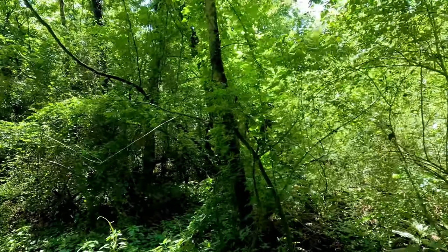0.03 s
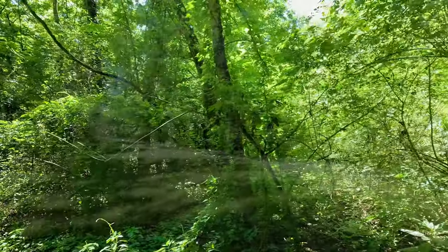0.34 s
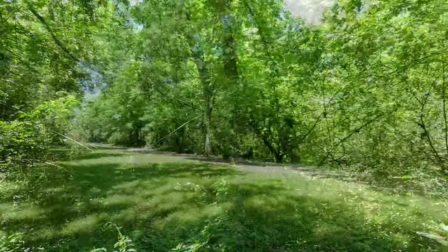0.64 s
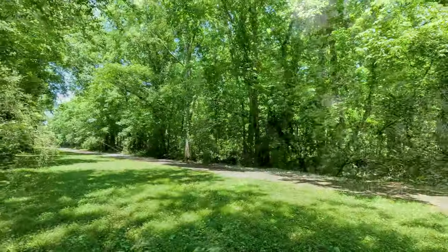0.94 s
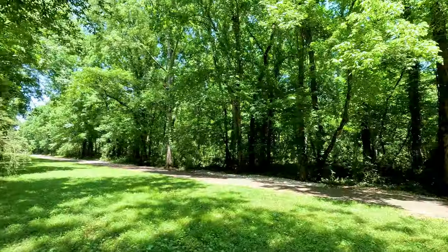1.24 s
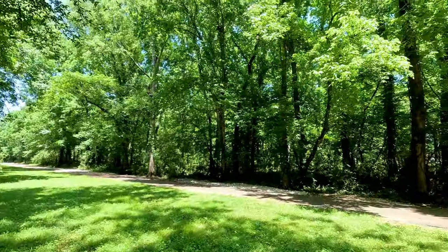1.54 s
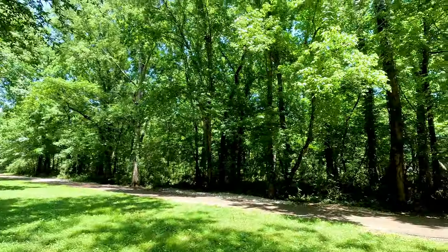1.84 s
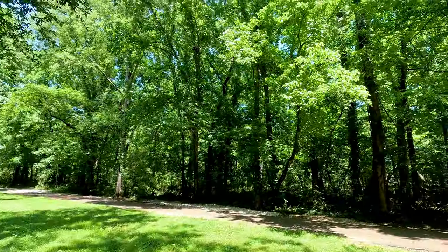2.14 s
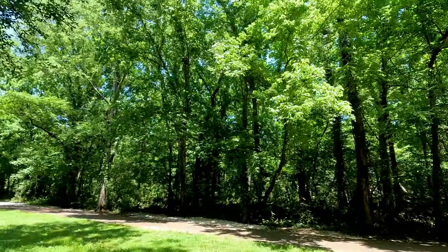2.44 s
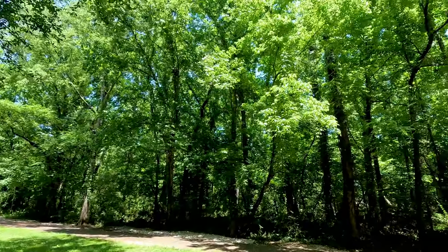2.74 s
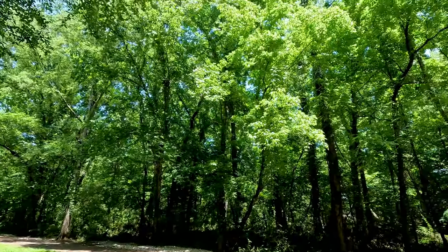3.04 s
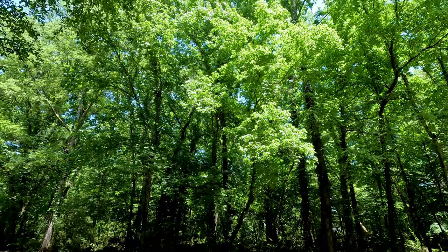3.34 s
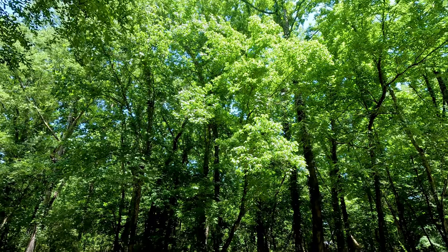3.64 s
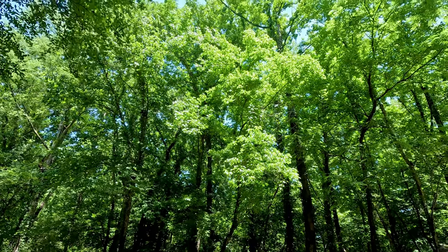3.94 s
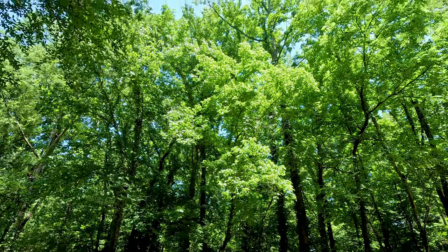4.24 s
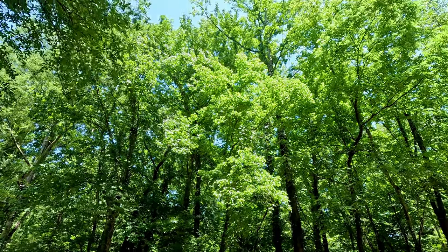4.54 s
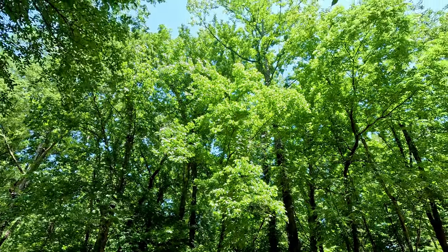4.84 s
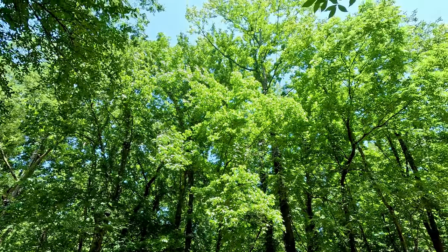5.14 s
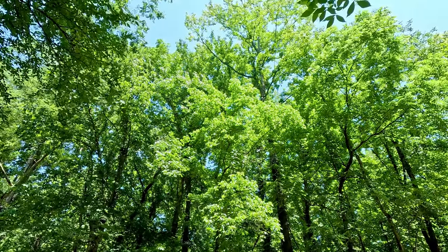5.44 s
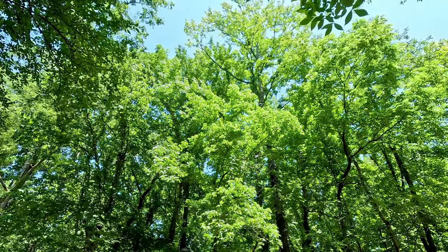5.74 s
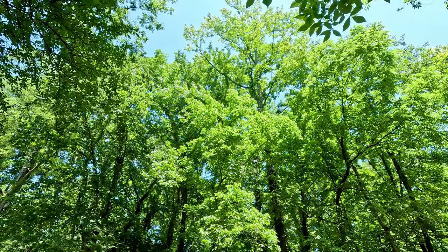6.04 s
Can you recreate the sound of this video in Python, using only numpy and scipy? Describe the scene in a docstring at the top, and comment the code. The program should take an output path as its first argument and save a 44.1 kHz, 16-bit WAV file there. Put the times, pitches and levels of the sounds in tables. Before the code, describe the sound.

A dense cicada chorus buzzes high and steady over a hollow whine, with a low rumble of distant traffic.

```python
"""Periodical cicadas in a sunny wood

One species buzzes near 6 kHz, its clicking tymbals driving a resonant abdomen, and surges now and then;
another holds a hollow whine near 1.1 kHz. A songbird whistles faintly and a distant road rumbles below.
Early on, the sound cross-fades from a thicket, where tyres and engines are louder, to an open lawn.
A few puffs of breeze buffet the microphone."""
import sys
import numpy as np
from scipy import signal
from scipy.fft import rfft, irfft, next_fast_len
from scipy.io import wavfile
from scipy.ndimage import uniform_filter1d

SR = 44100
rng = np.random.default_rng(int(sys.argv[2]) if len(sys.argv) > 2 else 0)


def digitize_waveform(pressure):
    """Quantize a signal to 16-bit integers and store it at the path in sys.argv[1].

    Rows of a 2-D input are taken as channels; values are limited to [-1, 1].
    """
    field = np.atleast_2d(pressure).T
    bounded = np.clip(field, -1, 1)
    quanta = np.round(bounded * 32767).astype(np.int16)
    wavfile.write(sys.argv[1], SR, quanta)


N = 268569
FADE_START_S, FADE_S = 0.41, 0.71  # the cross-fade from the thicket to the lawn


def buzz(tree_count=14, rise_db_per_s=0.32, deep_db=-1.5, whistle_db=-18):
    """Source and filter: tymbal clicks excite the resonances of hollow abdomens; a whistle rides on top."""
    # resonance curve of the abdomen: f/Hz, relative level/dB
    abdomen = [(2000, -55), (3000, -27), (3850, -11.5), (4700, -9.5), (5350, -1.5), (5900, -0.5),
               (6450, -3), (7200, -11.5), (7850, -17.5), (9000, -26.5), (10200, -46.5), (11800, -35),
               (13500, -54), (15000, -61)]
    # the fuller timbre in the thicket: f/Hz, gain/dB
    thicket_colour = [(2700, 1), (3500, 1), (4400, 1.6), (5500, -1.1), (9000, 0)]
    trees = steady(sum(ongoing(tymbals(click_hz=381.6, swell_db=3.5, count=3)) for _ in range(tree_count)))
    deep_wood = rng.standard_normal((2, N))  # clicks too many to tell apart
    chorus = diffuse(coloured(trees + amp(deep_db) * deep_wood, abdomen), left_db=1.3)
    chorus = lawn_share() * chorus + (1 - lawn_share()) * coloured(chorus, thicket_colour)
    whistle = diffuse(ongoing(held_note(hz=5870, waver=0.00137, swell_db=-1)), left_db=-4)
    flutter = amp(0.14 * wobble(25.2) + 0.3 * wobble(7.6))
    rise_db = rise_db_per_s * (times() - FADE_START_S - FADE_S) + surges()
    level = crossfade(thicket_db=-30.5, lawn_db=-31 + rise_db)
    return level * (flutter * chorus + amp(whistle_db) * whistle)


def tymbals(click_hz, swell_db, count):
    """Buckling: the ribs of each insect in a tree snap in an uneven impulse train that swells and fades."""
    clicks = np.zeros(N)
    for _ in range(count):
        rate_hz = click_hz * np.exp(.25 * rng.standard_normal() + .15 * wobble(90))
        cycles = np.cumsum(rate_hz) / SR
        snaps = np.flatnonzero(np.diff(np.floor(cycles)))
        strength = amp(swell_db * wobble(2.54)[snaps] + rng.normal(0, 2.7, len(snaps)))
        clicks[snaps] += strength * rng.choice([-1, 1], len(snaps))
    return unit(clicks)


def surges(attack_s=0.089, release_s=0.24):
    """Attack, hold and exponential release of the decibels that joining groups add to the buzz."""
    # groups of cicadas join in and drop out: onset t/s, hold/s, rise/dB
    groups = [(0.62, 0.39, 1), (1.156, 0.21, 0.9), (1.55, .2, 0.4), (2.04, .1, 1.2), (2.18, 0.12, 1),
              (2.92, 1, 0.93), (3.968, 0.11, 1.3), (4.07, 0.28, 0.9), (4.49, 0.5, 2.5), (5.28, .25, 0.6)]
    t = times()
    return sum(db * np.clip((t - onset) / attack_s, 0, 1)
               * np.exp(-np.maximum(t - onset - hold, 0) / release_s) for onset, hold, db in groups)


def whine(throb_db=0.6, low_choir_db=-7):
    """Superposition: a high choir swells over a weaker low one; the farthest insects blur into noise."""
    # waves of overlapping calls in the high choir: peak t/s, half length/s, rise/dB
    waves = [(1.22, 0.088, 4.5), (1.55, .06, 2.5), (2.074, 0.035, 7), (2.29, 0.063, 6), (2.79, 0.069, 5.5),
             (3.013, 0.075, 3), (3.244, .06, 5.5), (3.56, 0.031, 6.5), (3.76, 0.039, 5.5),
             (4.117, 0.031, 8), (4.33, .06, 2), (4.57, 0.041, 4), (5.08, 0.064, 5), (5.41, 0.064, 5),
             (5.66, 0.074, 5), (6.045, .05, 6.5)]
    # spectrum of the farthest insects: f/Hz, relative level/dB
    far_spectrum = [(400, -60), (650, -16.5), (800, -4.5), (915, -4.5), (1020, -1.5), (1150, -1),
                    (1260, -6.5), (1420, -9.5), (1700, -13.5), (2250, -21), (3000, -23.5), (5000, -81)]
    waves_db = sum(db * swell(peak_s, half_s) for peak_s, half_s, db in waves)
    throb = amp(waves_db + throb_db * wobble(8))
    high = throb * choir(hz=1112.0, spread=.046, waver=.013, count=14)
    low = amp(low_choir_db) * choir(hz=927.6, spread=.045, waver=.024, count=6)
    far = diffuse(noise(far_spectrum), left_db=0.5)
    return (crossfade(thicket_db=-43.5, lawn_db=-44.5) * high
            + crossfade(thicket_db=-42, lawn_db=-40.5) * (far + low))


def choir(hz, spread, waver, count):
    """Chorus effect: held notes clustered round one pitch merge among the trees into a drone of rms 1."""
    pitches = hz * (1 + spread * np.arcsin(np.linspace(-1, 1, count)) / (np.pi / 2))
    voices = sum(ongoing(held_note(pitch, waver, swell_db=1.5)) for pitch in pitches)
    return steady(diffuse(voices, left_db=1.5))


def held_note(hz, waver, swell_db):
    """Random frequency and amplitude modulation make an unsteady tone of rms 1."""
    pitch = hz * (1 + waver * (wobble(3) + wobble(60)))
    return unit(amp(swell_db * wobble(2.53)) * np.sin(2 * np.pi * np.cumsum(pitch) / SR))


def bird(trill_hz=75, waver_hz=12, accent_db=-3.0, direct_db=-5.0, reverberant_db=-4.0):
    """Frequency modulation: whistles slide to a pitch, some with a fast trill, and echo in the trees."""
    # whistled notes: t/s, length/s, slide/s, start f/Hz, held f/Hz, end f/Hz,
    # relative level/dB, trill depth/Hz
    notes = [(1.45, 0.053, 0.027, 2900, 2340, 2320, -51.5, 0),
             (1.662, 0.045, 0.026, 2860, 2470, 2390, -51.5, 0),
             (2.02, .086, 0.04, 3200, 3110, 3070, -47, 190), (2.178, 0.11, .05, 3080, 2700, 2670, -50, 0),
             (2.32, 0.084, 0.035, 2720, 2670, 2560, -51, 90),
             (2.41, 0.18, 0.082, 2720, 2830, 2850, -54, 220),
             (2.448, .062, 0.028, 3210, 3280, 3170, -46, 80),
             (2.541, 0.088, 0.043, 3100, 3210, 3260, -47, 100),
             (2.73, .055, .028, 2580, 2480, 2330, -52.5, 198),
             (2.95, .045, .022, 2690, 2730, 2760, -54, 30), (3.525, 0.099, .045, 2880, 2515, 2490, -52, 0),
             (3.633, .085, .03, 2540, 2580, 2580, -59, 30), (4.305, .04, .02, 2890, 2920, 3050, -53, 110),
             (4.338, 0.065, .05, 2880, 2430, 2440, -51, 40), (4.808, 0.067, .04, 3080, 2700, 2700, -58, 30),
             (4.89, .125, 0.075, 2680, 2810, 2920, -58, 30),
             (5.93, 0.1, .047, 2480, 2560, 2650, -55.5, 130), (6.045, 0.044, .02, 3340, 3260, 3150, -46, 2)]
    song = np.zeros(N + SR)
    for onset, length, slide, start, held, end, db, depth in notes:
        progress = np.linspace(0, 1, int(length * SR))
        glide = np.interp(progress, [0, min(slide / length, 1), 1], [start, held, end])
        trill = depth * np.sin(2 * np.pi * trill_hz * length * progress)
        pitch = glide + waver_hz * wobble(207)[:len(progress)] + trill
        envelope = amp(accent_db * progress) * np.sqrt(np.abs(np.sin(np.pi * progress)))
        note = unit(envelope * np.sin(2 * np.pi * np.cumsum(pitch) / SR))
        song[round(onset * SR):][:len(note)] += amp(db) * note
    return amp(direct_db) * song[:N] + amp(reverberant_db) * forest(song)[:, :N]


def rumble(fall_db_per_s=0.38):
    """Amplitude-modulated noise: the bass of far traffic swells, dips and slowly sinks."""
    # spectrum of the rumble: f/Hz, relative level/dB
    spectrum = [(8, -37), (20, 0.5), (35, -1.5), (65, 2), (95, -3.5), (130, -2.5), (175, -12), (280, -55),
                (600, -83)]
    # swells and dips: t/s, half length/s, change/dB
    swells = [(0.15, 0.045, 3), (1.026, 0.027, 3.5), (1.42, 0.036, 3.5), (2.105, 0.04, 2),
              (2.28, 0.074, -6)]
    bass = steady(diffuse(noise(spectrum), left_db=-.3))
    swells_db = sum(db * swell(peak_s, half_s) for peak_s, half_s, db in swells)
    return crossfade(thicket_db=-38.5, lawn_db=-36.5) * amp(swells_db - fall_db_per_s * times()) * bass


def engines(nearest_s=1.84, half_power_s=0.29, passing_db=-45):
    """Incoherent addition: the power of one passing engine adds to the drone of the far road."""
    # spectrum of the drone: f/Hz, relative level/dB
    spectrum = [(70, -31), (130, -3), (165, -1.5), (215, 0.5), (270, -10.5), (400, -14.5), (800, -61)]
    passing = lawn_share() * amp(passing_db) / np.hypot(1, (times() - nearest_s) / half_power_s)
    level = np.hypot(crossfade(thicket_db=-44.5, lawn_db=-48), passing)
    return level * diffuse(noise(spectrum), left_db=-.3)


def tyres(nearest_s=2.74, half_power_s=3.1, thicket_left_db=4):
    """Spherical spreading: on the lawn, the roar of tyres goes as 1 / distance while traffic passes."""
    # spectrum of the roar: f/Hz, relative level/dB
    spectrum = [(80, -30), (200, -19), (300, -1), (480, -1.5), (700, 2), (950, 1), (1400, -13),
                (2500, -22.5), (6000, -60)]
    nearness = 1 / np.hypot(1, lawn_share() * (times() - nearest_s) / half_power_s)
    left_db = thicket_left_db * (1 - lawn_share())
    roar = diffuse(noise(spectrum), left_db=0) * amp([left_db / 2, -left_db / 2])
    return crossfade(thicket_db=-40, lawn_db=-46.5) * nearness * roar


def vehicle():
    """Tonal engine noise: low tones boom in turn as it passes the thicket, in phase at both ears."""
    # engine tones: f/Hz, peak t/s, half length/s, level/dB
    tones = [(68.3, 0.36, 0.19, -39), (122.8, 0.505, 0.11, -37.5), (174.5, 0.18, 0.12, -42.5)]
    return sum(amp(db) * swell(peak_s, half_s) * held_note(hz, waver=0.014, swell_db=1.5)
               for hz, peak_s, half_s, db in tones)


def breeze():
    """Wind noise: puffs of air buffet each microphone port on its own, so the channels are uncorrelated."""
    # puffs of air: peak t/s, half length/s, level/dB
    puffs = [(0.152, 0.013, -46), (1.204, 0.026, -42), (1.698, 0.038, -34.5)]
    # spectrum of the buffeting: f/Hz, relative level/dB
    spectrum = [(15, -14), (55, 5), (100, -26), (230, 1.5), (330, -10.5), (450, -12.5), (900, -37),
                (2000, -70)]
    return sum(amp(db) * swell(peak_s, half_s) for peak_s, half_s, db in puffs) * noise(spectrum)


def forest(x):
    """Multiple scattering by trunks and leaves gives two uncorrelated tails; the treble dies first."""
    # reverberation time of the wood: f/Hz, T60/s
    decay_times = [(500, 0.75), (2500, 0.94), (6000, 0.73), (14000, 0.27)]
    hz, t, spectrogram = signal.stft(rng.standard_normal((2, SR // 2)), SR, nperseg=256)
    decay = amp(-60 * t / along(decay_times, hz)[:, None])
    tails = signal.istft(spectrogram * decay, SR, nperseg=256)[1]
    return signal.fftconvolve(x[None], tails / np.linalg.norm(tails[0]), axes=1)


def ongoing(x):
    """Steady-state reverberation: a lead-in lets the forest's tails build up beforehand."""
    lead = SR // 2
    return forest(np.pad(x, (lead, 0), mode="reflect"))[:, lead:lead + N]


def diffuse(pair, left_db):
    """Diffuse field: two unrelated signals mix into stereo of rms 1, most coherent in the bass."""
    # likeness of left and right: f/Hz, correlation
    coherence = [(30, .99), (70, .994), (140, .993), (220, .975), (320, .9), (600, .85), (1100, .82),
                 (2300, .6), (4000, .72), (5800, .85), (8000, .74), (12000, .62)]

    def mid_side_gains(hz):
        angle = np.arccos(np.clip(along(coherence, hz), -1, 1)) / 2
        return np.array([np.cos(angle), np.sin(angle)])

    mid, side = filtered(pair, mid_side_gains)
    return unit(np.array([mid + side, mid - side]) * amp([[left_db / 2], [-left_db / 2]]))


def crossfade(thicket_db, lawn_db):
    """Gain of a layer heard at both spots: uncorrelated powers add, so the level sags midway."""
    share = lawn_share()
    return np.hypot((1 - share) * amp(thicket_db), share * amp(lawn_db))


def lawn_share():
    """Linear ramp: 0 in the thicket, 1 on the lawn."""
    return np.clip((times() - FADE_START_S) / FADE_S, 0, 1)


def steady(x, window_s=0.129):
    """Division by the running rms evens out slow chance swells, leaving rms 1."""
    power = np.abs(uniform_filter1d(np.mean(x ** 2, axis=0), int(window_s * SR)))
    return unit(x / np.sqrt(power + 1e-9))


def swell(peak_s, half_s):
    """Gaussian envelope of height 1 and standard deviation half_s."""
    return np.exp(-.5 * ((times() - peak_s) / half_s) ** 2)


def wobble(rate_hz):
    """Random modulation: straight lines join Gaussian knots, rate_hz of them a second."""
    position = np.arange(N) * rate_hz / SR + rng.random()
    knots = rng.standard_normal(int(position[-1]) + 2)
    return np.interp(position, np.arange(len(knots)), knots)


def noise(spectrum):
    """Two uncorrelated channels of coloured noise, rms 1."""
    return unit(coloured(rng.standard_normal((2, N)), spectrum))


def coloured(x, spectrum):
    """Spectral shaping by a curve of f/Hz, gain/dB."""
    return filtered(x, lambda hz: amp(along(spectrum, hz)))


def filtered(x, response):
    """Linear filtering: the spectrum of x times a frequency response."""
    size = next_fast_len(N + SR // 2)
    return irfft(rfft(x, size) * response(np.fft.rfftfreq(size, 1 / SR)), size)[..., :N]


def along(points, hz):
    """Interpolation of (f/Hz, value) points on a logarithmic frequency axis."""
    frequencies, values = np.transpose(points)
    return np.interp(np.log(hz + 1), np.log(frequencies + 1), values)


def amp(db):
    """Decibels to amplitude ratio."""
    return 10 ** (np.asarray(db) / 20)


def unit(x):
    """Normalisation to rms 1."""
    return x / np.sqrt(np.mean(x ** 2) + 1e-20)


def times():
    """t/s of every sample."""
    return np.arange(N) / SR


def scene():
    """Superposition of both choruses, the bird, the traffic and the breeze."""
    return buzz() + whine() + bird() + rumble() + engines() + tyres() + vehicle() + breeze()


def record(dry, top_hz=15200):
    """Band limiting: an ideal low-pass filter passes nothing above top_hz."""
    return filtered(dry, lambda hz: hz < top_hz)


dry = scene()
out = record(dry)
digitize_waveform(out)
```